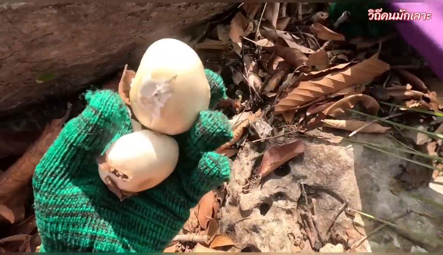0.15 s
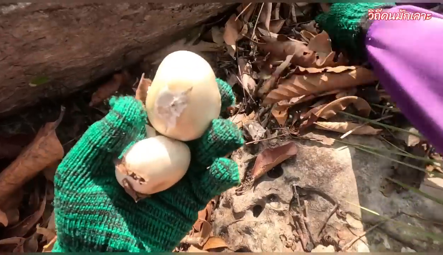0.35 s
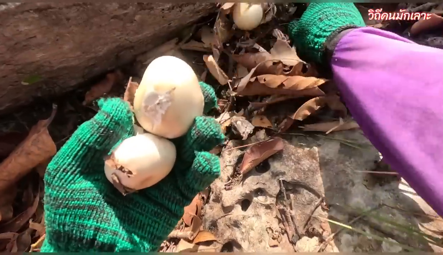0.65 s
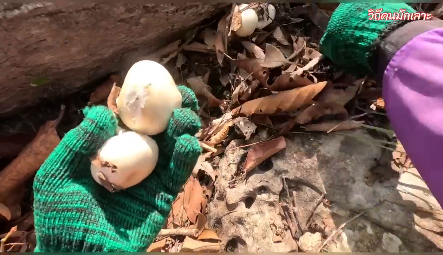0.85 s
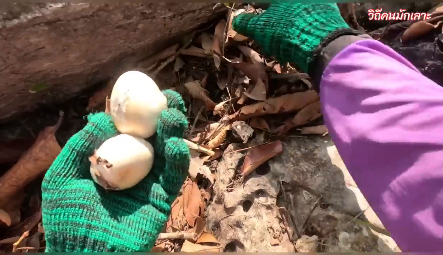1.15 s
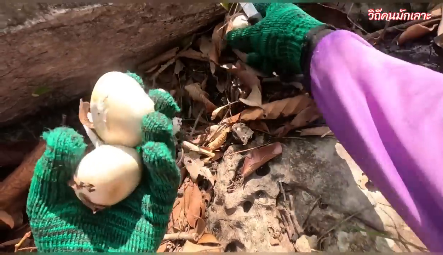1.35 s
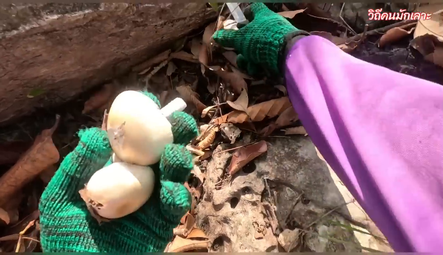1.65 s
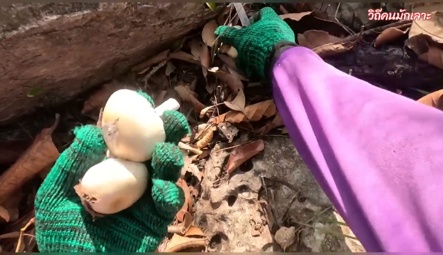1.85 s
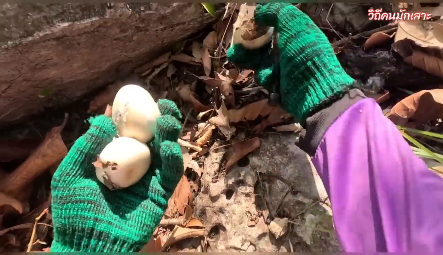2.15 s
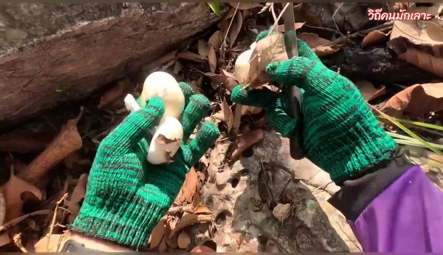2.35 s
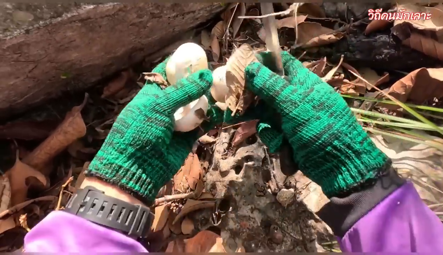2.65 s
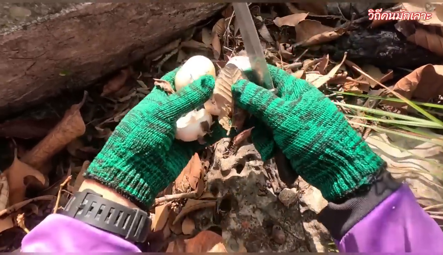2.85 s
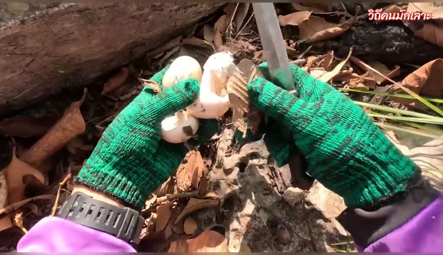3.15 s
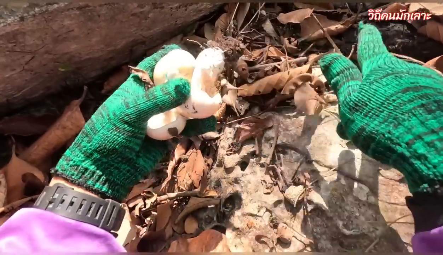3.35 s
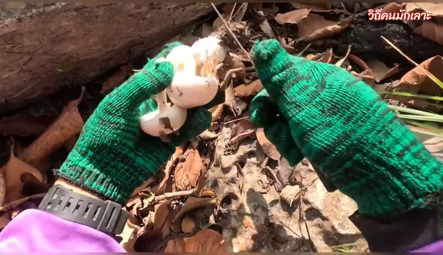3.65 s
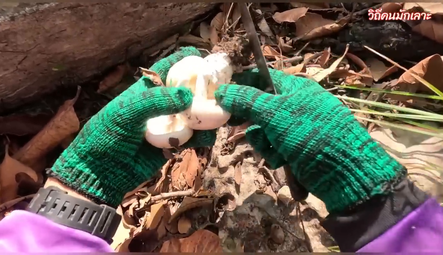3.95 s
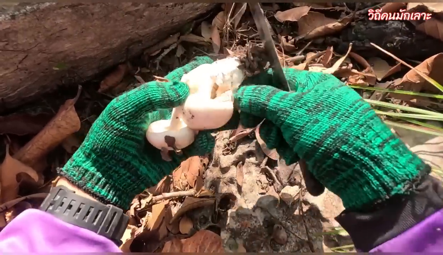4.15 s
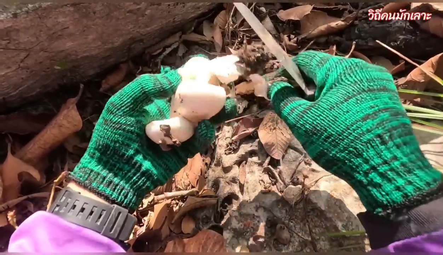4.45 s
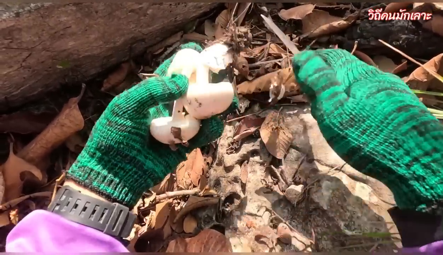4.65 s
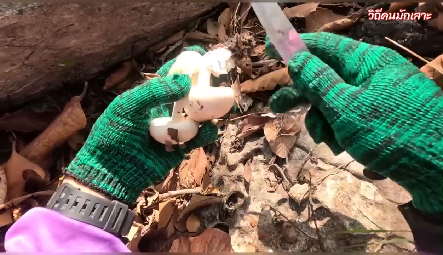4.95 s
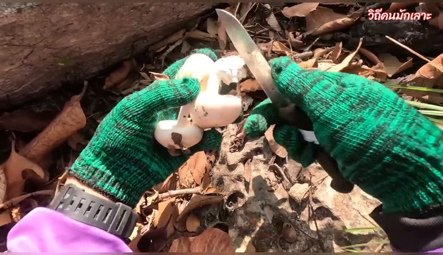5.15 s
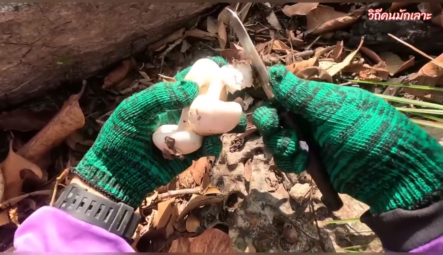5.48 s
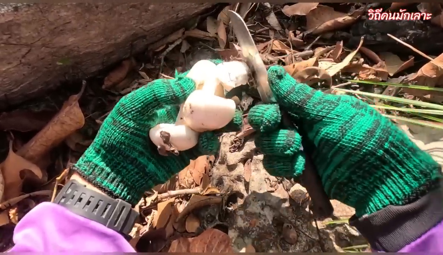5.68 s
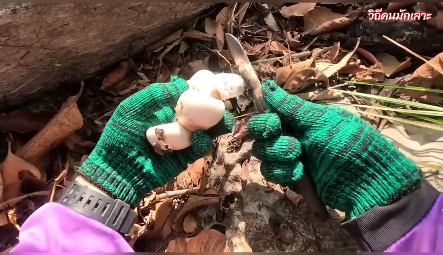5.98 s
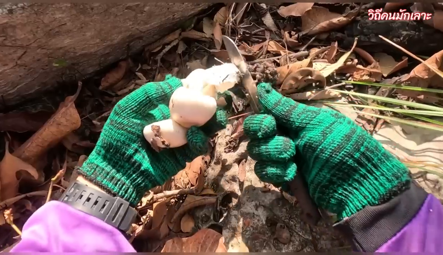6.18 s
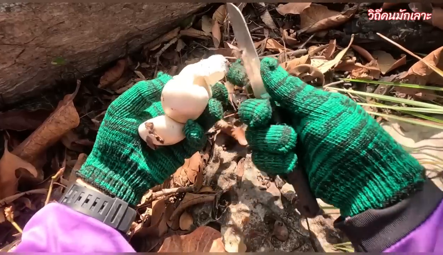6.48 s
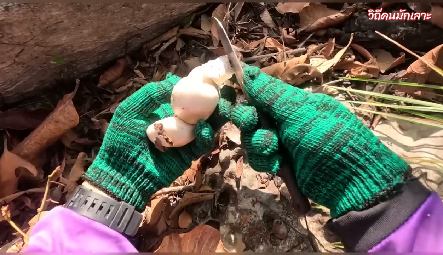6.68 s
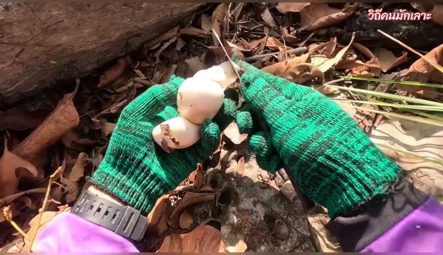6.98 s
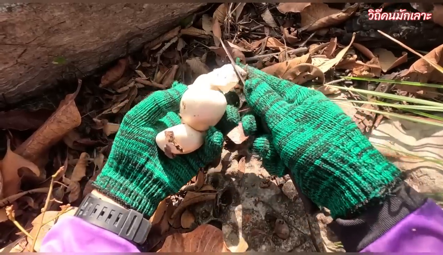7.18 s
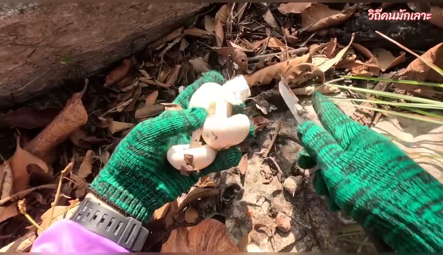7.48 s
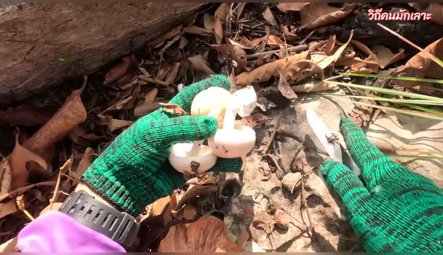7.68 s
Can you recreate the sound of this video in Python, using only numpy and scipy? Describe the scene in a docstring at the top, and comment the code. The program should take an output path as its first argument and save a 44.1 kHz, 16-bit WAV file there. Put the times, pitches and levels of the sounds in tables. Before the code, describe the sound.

From 0 to about 0.9 seconds, gloved hands rake dry leaves close to the microphone, slightly right of centre: dense bright rustle, brittle crackles and sharp snaps. From 1.1 to 2.1 seconds the stirring continues in softer, hissier strokes with scattered cracks, then falls away with a few light ticks and a soft knock near 2.3. A near-quiet gap follows, with faint outdoor hush and thin wavering insect tones. At 3.1 to 4.3 seconds small peeling crackles gather, strongest around 3.8, ending in a dull low tap. Sparse tiny clicks and scrapes follow, including a cluster near 4.8 and a tick with a knock at 5.5. A crisp snap at 6.5 and another at 7.0 stand out among delicate trimming crackles. Slight rustling closes the scene, now narrow and central.

```python
"""Gloved hands rake dry leaves on a forest floor, then peel and trim mushrooms close to the microphone.
Leaves rustle as many tiny clicks that ring short bursts of noise, mixed with friction hiss.
Single leaves and crusts snap as bursts of clicks with ringing tones; soft knocks are short low tones.
Far insects sing as thin wavering tones over a hush of filtered noise.
The sound starts wide and narrows to the centre."""
import sys
import numpy as np
from scipy import signal
from scipy.fft import rfft, irfft, next_fast_len
from scipy.io import wavfile
from scipy.ndimage import uniform_filter1d

SR = 44100
rng = np.random.default_rng(int(sys.argv[2]) if len(sys.argv) > 2 else 0)


def unload_wav(signal):
    """Save mono or channel-first audio to the path in sys.argv[1] as 16-bit WAV at rate SR, clipped to [-1, 1]."""
    wavfile.write(
        sys.argv[1],
        SR,
        np.round(np.clip(np.atleast_2d(signal).T, -1, 1) * 32767).astype(np.int16),
    )


N = 344862  # length [samples]

# Colour of the leaf litter, for rustle and snaps: (frequency [Hz], relative level [dB per Hz])
LEAF_COLOUR = [(59, -36), (110, -14), (185, -8), (471, -16), (750, -18.5), (980, -14.5), (1230, -16),
               (1390, -14.5), (2080, -13.5), (2320, -11), (3860, -0.5), (4380, -5), (7450, 1.5),
               (10200, -26.5), (11900, -20), (16000, -50)]


def gain_of(db):
    """Turns decibels into a factor that multiplies the sound."""
    return 10 ** (np.asarray(db) / 20)


def evened(x):
    """Scales x to an average (RMS) strength of 1."""
    return x / np.sqrt(np.mean(x ** 2) + 1e-20)


def curve(rows):
    """Draws straight lines between rows of (time [s], values...), giving one curve per value column."""
    s, *columns = np.transpose(list(rows))
    t = np.arange(N) / SR
    return [np.interp(t, s, column) for column in columns]


def coloured(x, points):
    """Makes some pitches of x stronger than others, following points of (frequency [Hz], level [dB])."""
    length = x.shape[-1]
    size = next_fast_len(length)
    hz, db = np.transpose(points)
    pitches_hz = np.fft.rfftfreq(size, 1 / SR)
    # The 1 added keeps the logarithm safe at 0 Hz.
    gain = gain_of(np.interp(np.log(pitches_hz + 1), np.log(hz + 1), db))
    return irfft(rfft(x, size) * gain, size)[..., :length]


def band(x, lo_hz, hi_hz):
    """Keeps the pitches between two limits and weakens the rest."""
    return signal.sosfilt(signal.butter(3, [lo_hz, hi_hz], "bandpass", fs=SR, output="sos"), x)


def below(x, hz):
    """Keeps the pitches below a limit, without delaying them."""
    return signal.sosfiltfilt(signal.butter(3, hz, fs=SR, output="sos"), x)


def top(x):
    """Keeps the pitches above 10.4 kHz, without delaying them."""
    return signal.sosfiltfilt(signal.butter(4, 10400, "highpass", fs=SR, output="sos"), x)


def crackle(shape, per_s, spread_db):
    """Scatters clicks of random sign; a few are much larger than the rest."""
    size = gain_of(spread_db * np.minimum(rng.exponential(1, shape), 4))
    clicks_here = rng.random(shape) < per_s / SR
    return size * rng.standard_normal(shape) * clicks_here


def rustle():
    """Crackles swell in clumps; each rings a leaf for a moment, and friction adds a smooth hiss."""
    # Friction hiss against the crackle, and how far clumps swell: (time [s], hiss [dB], fitfulness [dB])
    texture = [(0, 3.5, 1.75), (1.0, 20.5, 1.9), (1.4, 14, 1.4), (2.1, -3, 1.5), (2.4, 8, 3.5), (4.8, 0, 2),
               (7.2, -4, 1), (7.45, 8, 1.3), (7.82, 5.5, -0.2)]
    # Low end, full only while digging: (time [s], level [dB])
    body = [(0, -1), (.85, -1), (1.1, -7), (2.0, -6), (2.4, -14), (7.82, -16)]
    # Lift of the band above 10.4 kHz before the crisp part is evened: (time [s], relative level [dB])
    top_lift = [(0, -3.5), (2.0, 0.5), (2.6, 8), (3.6, 8), (4.5, 2.5), (5.5, 5), (7.0, 3.5), (7.82, 5.5)]

    crisp_gain, dull_gain = effort()
    hiss_db, fitful_db = curve(texture)
    low_gain = gain_of(curve(body)[0])
    top_gain = gain_of(curve(top_lift)[0])
    clumps = evened(uniform_filter1d(uniform_filter1d(rng.standard_normal(N), 500), 300))

    t = np.arange(500) / SR
    grains = np.zeros((2, N))  # row 0 is the centre, row 1 the side
    for hz in np.geomspace(400, 6000, num=10):  # from large, dull leaves to small, bright ones
        dying_noise = rng.standard_normal(len(t)) * gain_of(-60 * t / 0.019)
        ring = band(dying_noise, hz, 3 * hz)
        clicks = crackle((2, N), 150, spread_db=4.5)
        grains += signal.oaconvolve(clicks, ring[None])[:, :N]

    hiss_gain = gain_of(hiss_db)
    mixed = evened(grains) + hiss_gain * rng.standard_normal((2, N))
    steady = mixed / np.sqrt(1 + hiss_gain ** 2)  # more hiss does not make it louder
    leaves = coloured(gain_of(fitful_db * clumps) * steady, LEAF_COLOUR)

    low, dull = below(leaves, 1050), below(leaves, 2500)
    crisp = evened(leaves - dull + (top_gain - 1) * top(leaves))
    return crisp_gain * crisp + dull_gain / np.std(dull) * (dull - low + low_gain * low)


def effort():
    """Gives crisp and dull rustle gains: strokes rise, hold and die away over the stirring."""
    # Hands and sleeves stir faintly all along: (time [s], level [dB], dull part against it [dB])
    stir = [(0, -39, -3.5), (.9, -36, -4.5), (1.2, -52.5, -5), (1.4, -51, 3.5), (2.0, -44.5, -3.5),
            (2.25, -58, -2), (2.8, -70, -7), (3.05, -71.5, 5.5), (3.3, -64.5, -10), (3.5, -65.5, 5),
            (3.7, -62, 3), (3.95, -61.5, 2), (4.35, -65.5, -4.5), (4.7, -56.5, -10.5), (5.0, -64.5, -20),
            (5.2, -64, -5), (5.45, -71, -7), (5.7, -67, -4), (6.0, -76, -11), (6.22, -94, -15),
            (6.4, -76, 1), (6.9, -70, -3), (7.19, -73, -8), (7.3, -85, 7), (7.82, -54.5, -7)]
    # Strokes through leaves and over caps: (start [s], hold [s], effort [dB], dull part against it [dB])
    strokes = [(0.026, 0.0097, -32, -5), (0.244, 0.18, -33.5, -9), (0.517, 0.087, -33.5, -5),
               (0.554, 0.1, -26.5, -4.5), (0.679, 0.04, -35, 1), (0.725, 0.026, -30, -7.5),
               (0.789, 0.046, -35, -6), (0.959, 0.11, -39, -5.5), (1.131, 0.0074, -38, -4.5),
               (1.25, 0.046, -42, 0.5), (1.32, 0.13, -37, -3), (1.509, 0.011, -40, -0.5),
               (1.606, 0.11, -40, -1), (1.746, 0.047, -37, -2.5), (1.92, 0.2, -48.5, -6),
               (2.319, 0.14, -58.5, 2), (2.546, 0.17, -60, -1.5), (2.765, 0.13, -61, 1.5),
               (3.103, 0.012, -53.5, -6), (3.3, 0.15, -56.5, -5.5), (4.067, 0.027, -53.5, -7),
               (4.102, 0.014, -53.5, 1.5), (4.12, 0.14, -52, -7.5), (4.386, 0.022, -69.5, 9.5),
               (4.65, 0.017, -56.5, -23), (4.751, .01, -63, 0), (4.766, 0.013, -48.5, -8),
               (5.148, 0.04, -58.5, -14), (5.337, 0.016, -61, -7), (5.819, 0.03, -62, -3),
               (5.96, 0.012, -58.5, -5), (6.039, 0.0054, -63, -3), (6.088, 0.0076, -54, -2.5),
               (6.117, 0.005, -58, -19), (6.242, 0.31, -63, -13), (6.32, .02, -76, -20),
               (6.496, 0.021, -39, -8), (6.592, 0.041, -50.5, -3), (6.665, 0.1, -55, -1),
               (6.804, 0.034, -57.5, -6.5), (7.1, 0.0044, -54.5, -1.5), (7.232, 0.0082, -66, 5.5),
               (7.348, 0.13, -61.5, 0.5), (7.408, 0.32, -56, -3.5), (7.502, 0.18, -59, 2)]
    rise_s, fall_db_per_s = 0.004, 264

    t = np.arange(N) / SR
    stir_db, stir_dull_db = curve(stir)
    crisp_power = gain_of(stir_db) ** 2
    dull_power = gain_of(stir_db + stir_dull_db) ** 2
    for s, hold_s, db, dull_db in strokes:
        rise = np.clip((t - s) / rise_s, 0, 1)
        falling_s = np.maximum(t - s - rise_s - hold_s, 0)
        power = (rise * gain_of(db - fall_db_per_s * falling_s)) ** 2
        crisp_power = crisp_power + power
        dull_power = dull_power + power * gain_of(dull_db) ** 2
    return np.sqrt(crisp_power), np.sqrt(dull_power)


def snaps():
    """A crack runs through dry matter as a burst of clicks and rings the piece; lower parts last longer."""
    # Snaps: (time [s], middle part's peak [dB], bright part against it [dB], dull part against it [dB],
    # low tone [Hz], high tone [Hz], time for the middle part's clicks to fall 60 dB [s])
    snap_rows = [(0.0353, -10.5, -1.5, -15, 1400, 7400, 0.035), (0.1176, -20, -2, -27, 2300, 7140, 0.041),
                 (0.2035, -26, -17, -9.5, 1000, 5430, 0.036), (0.216, -20.5, -1.5, -22, 2700, 5300, 0.068),
                 (0.2562, -13.5, -24, -25, 2220, 5100, 0.024), (0.2953, -14, -4, -26, 2670, 3820, 0.028),
                 (0.3125, -14, -1.5, -10.5, 1010, 7760, 0.084), (0.347, -19, 0, -16, 2470, 3900, 0.024),
                 (0.3728, -19, -11, -9, 2430, 4060, 0.022), (0.385, -14, -11, -11, 1630, 4000, 0.011),
                 (0.421, -23.5, -17, -0.5, 2800, 3500, 0.032), (0.4712, -15.5, -2.5, -5, 1960, 7450, 0.013),
                 (0.5232, -25, 2, -8, 1700, 7660, 0.019), (0.6164, -22, 11, -15, 2730, 7200, 0.019),
                 (0.6372, -14.5, 0.5, -14, 1330, 7500, 0.073), (0.7296, -15, -5, -30, 2690, 3290, 0.033),
                 (0.8137, -13, -8, -23, 1730, 7350, 0.014), (1.144, -29, -12, 1.5, 1400, 5100, 0.024),
                 (1.232, -26, -6, -7, 1760, 5600, 0.026), (1.2397, -15, -3.5, 0.5, 2560, 2800, 0.014),
                 (1.2553, -20, 0, -17, 2940, 7240, 0.034), (1.2597, -16, -4, -12, 2470, 3700, 0.031),
                 (1.3365, -24, 7.5, -25, 2440, 7750, 0.011), (1.3633, -28, -10, -24, 2660, 4970, 0.022),
                 (1.3929, -17.5, -7.5, -5.5, 930, 3260, 0.069), (1.488, -26.5, -4, -22, 2420, 7000, 0.034),
                 (1.5247, -23.5, -6, -24, 2530, 3940, 0.038), (1.6045, -22.5, -9, -27, 2740, 3080, 0.016),
                 (1.6694, -23.5, -1, -22, 1500, 3200, 0.017), (1.7125, -39, -1, -13, 2710, 6440, 0.018),
                 (1.7587, -27.5, 8, -7, 2030, 7400, 0.0069), (1.8891, -40, -9, -18, 2780, 7360, 0.022),
                 (1.9, -31, -17, -15, 1610, 3220, 0.026), (1.9663, -21, -3, -9.5, 2360, 7000, 0.031),
                 (1.992, -37, -9, -5, 1340, 7050, 0.022), (2.093, -28.5, -17, -15, 2020, 3110, 0.027),
                 (2.223, -25.5, -14, -29, 2300, 4200, 0.012), (2.2653, -41, 2, 0.5, 1200, 7040, 0.017),
                 (2.279, -26.5, -1.5, -31, 3070, 7550, 0.012), (2.337, -39.5, -8, -1, 1910, 3870, 0.015),
                 (2.357, -42, -13, 6.5, 1330, 3570, 0.016), (2.381, -43, -9, -14, 2040, 3660, 0.017),
                 (2.394, -32.5, -6, -1, 1270, 3750, 0.031), (2.4577, -33.5, -7, -20, 1030, 4040, 0.03),
                 (2.5483, -34.5, 2, -32, 2530, 7600, 0.14), (3.133, -35.5, -12, -9, 1970, 5500, 0.052),
                 (3.316, -37, -3, -27, 2320, 6830, 0.02), (3.3345, -30, -1, -20, 1990, 5270, 0.013),
                 (3.351, -28.5, 0, -30, 2400, 4800, 0.044), (3.3837, -22.5, 2, -13, 1970, 4340, 0.023),
                 (3.3994, -40, -12, -16, 2800, 3620, 0.017), (3.4267, -25.5, -7, -26, 1980, 3730, 0.023),
                 (3.431, -39.5, 11, -1, 1300, 7100, 0.019), (3.461, -25, -28, -1, 1870, 3220, 0.015),
                 (3.4844, -45, -10, -16, 2800, 4640, 0.02), (3.496, -29, -9, -9, 1270, 3350, 0.015),
                 (3.5245, -35, -2, -7, 2440, 4650, 0.022), (3.573, -42, -8, -17, 2200, 3600, 0.01),
                 (3.5876, -30.5, -7.5, -8.5, 1900, 4550, 0.035), (3.611, -43, -6, -9, 2300, 4600, 0.011),
                 (3.6272, -34, -9, -14, 1840, 4530, 0.053), (3.661, -41, -2, -20, 2500, 4630, .025),
                 (3.688, -38, -3, -19, 2600, 4740, 0.038), (3.746, -46, -10, -4, 2300, 3000, .01),
                 (3.7604, -45, -12, -19, 2700, 5600, 0.014), (3.777, -18, -3.5, -7, 2980, 4080, 0.024),
                 (3.8009, -14, -10, -5, 1080, 4030, 0.032), (3.8464, -18.5, -13, -1, 2340, 4270, 0.024),
                 (3.873, -43, -8, 6, 1980, 5680, 0.015), (3.9026, -31.5, -22, 1.5, 1360, 3140, 0.039),
                 (3.92, -38, -13, 0, 2070, 2840, 0.022), (3.9439, -51, -9, 6, 2390, 3920, 0.01),
                 (3.9759, -26, -12, 2, 2100, 5050, 0.021), (4.0067, -33, -19, -12, 2040, 4200, 0.012),
                 (4.073, -46, 1, -4, 2340, 7600, 0.03), (4.091, -41, -2, 8.5, 1970, 5650, 0.028),
                 (4.118, -37, 5, -16, 2690, 6750, 0.015), (4.1592, -30, 1.5, -7.5, 2030, 7600, 0.035),
                 (4.1956, -27, -4, -2.5, 2190, 3310, 0.0052), (4.2133, -30.5, -5, -24, 2690, 6440, 0.0081),
                 (4.2444, -27, -3, -26, 2820, 7250, 0.0083), (4.253, -37, 0, -10, 2300, 7400, 0.011),
                 (4.2624, -40, -5, -11, 2740, 7290, 0.019), (4.3081, -34, -6, 0, 1390, 3000, 0.014),
                 (4.3066, -29.5, -9, 1, 2150, 3340, 0.011), (4.526, -46, -1, -8, 2300, 3800, .015),
                 (4.6657, -41, 6, -23, 2500, 4000, 0.017), (4.7145, -48, 5, -18, 2800, 5800, .012),
                 (4.7487, -54, -9, 0, 1920, 5760, 0.022), (4.769, -27, -17, -13.5, 2190, 3550, 0.031),
                 (4.7835, -35.5, -9, -22, 2370, 5300, 0.02), (4.788, -34, -4, -15, 2380, 5630, 0.011),
                 (4.795, -40, 5, -15, 2500, 7370, 0.02), (4.824, -44, 1, -15, 2800, 6500, .012),
                 (4.8352, -43, 2, -17, 2500, 7800, .015), (4.8747, -31, -11, -14, 2130, 4430, 0.052),
                 (4.9204, -42.5, -4, -14, 2820, 4000, 0.018), (5.022, -46, -3, -25, 2750, 5770, 0.018),
                 (5.1835, -40, -8, -9, 2500, 3300, 0.013), (5.212, -49, -10, -7, 2100, 3260, .015),
                 (5.4996, -27.5, -4, -12.5, 2810, 4400, 0.005),
                 (5.853, -38.5, -12, -16, 2900, 3600, 0.0062), (5.9704, -38, -13, -20, 2870, 5780, 0.031),
                 (6.043, -45, -16, -2.5, 1200, 5640, 0.025), (6.098, -33, -8, -11, 2300, 5110, 0.028),
                 (6.128, -40.5, 6, -13, 2350, 5660, 0.028), (6.4648, -42, -7, -19, 2600, 4440, 0.011),
                 (6.5073, -17, -7, -38, 2240, 3760, 0.018), (6.5889, -42, 2, -16, 2480, 5660, 0.022),
                 (6.6112, -31, -8, -24, 2690, 3940, 0.013), (6.6444, -33, -12, -7, 1830, 6470, 0.024),
                 (6.711, -34.5, -2, -8, 2800, 3650, 0.022), (6.7487, -35, -21, -21, 2500, 3700, 0.022),
                 (6.7894, -55, -8, -16, 2700, 5800, 0.022), (6.817, -44, -10, -19, 2760, 3120, 0.024),
                 (6.8478, -39, -12, -23, 2450, 5820, 0.036), (6.996, -21.5, -9, -12.5, 2300, 3980, 0.011),
                 (7.0232, -31, -6, -16, 2720, 4140, 0.016), (7.0313, -41, 0, -15, 2600, 4600, 0.019),
                 (7.073, -44, -7, -16, 2590, 5800, 0.019), (7.1088, -27.5, -4, -19, 2820, 4300, 0.056),
                 (7.132, -38, -15, -16, 1420, 5780, 0.024), (7.243, -39, -14, -12, 1510, 5700, 0.041),
                 (7.6231, -36, -5, -25, 2190, 4800, 0.036)]

    t = np.arange(3072) / SR
    out = np.zeros((2, N + len(t)))
    for s, db, bright_db, dull_db, low_hz, high_hz, decay_s in snap_rows:
        burst = crackle((2, len(t)), 14000, spread_db=4.5)
        burst[:, 8] += 8.0  # the first break
        tones_hz = [low_hz, high_hz, rng.uniform(5130, 10500)]
        width_hz = 6 / decay_s  # a short snap rings less purely
        # Each part: (level against the middle [dB], lowest [Hz], highest [Hz], times the decay)
        parts = [(bright_db, 5500, 16000, 0.8), (0, 2500, 5500, 1), (dull_db, 1050, 2500, 1.5)]
        at = round(s * SR)
        for part_db, lo_hz, hi_hz, longer in parts:
            crack = burst * gain_of(-60 * t / (decay_s * longer))
            part = band(coloured(ringing(crack, tones_hz, width_hz), LEAF_COLOUR), lo_hz, hi_hz)
            centre_peak = abs(signal.hilbert(part[0])).max()
            out[:, at:at + len(t)] += gain_of(db + part_db) * part / centre_peak
    return out[:, :N]


def ringing(x, tones_hz, width_hz):
    """Lifts the piece's own tones out of x with narrow resonances."""
    ring_db = 11  # level of the added tones
    tones = sum(signal.lfilter(*signal.iirpeak(hz, hz / width_hz, SR), x) for hz in tones_hz)
    return x + gain_of(ring_db) * tones


def knocks():
    """A dull blow sounds as a quickly dying low tone together with a wide thud."""
    # Soft knocks of knuckle or knife handle: (time [s], peak [dB], pitch [Hz])
    knock_rows = [(2.263, -49, 197), (3.131, -41.5, 189), (4.303, -47, 330), (5.5, -47.5, 203),
                  (6.507, -44, 131), (7.106, -47.5, 138)]
    ring_s, thud_share = 0.035, 0.9  # time to fall 60 dB; strength of the thud against the tone

    t = np.arange(4000) / SR
    out = np.zeros(N + len(t))
    for s, db, hz in knock_rows:
        thud = evened(band(rng.standard_normal(len(t)), 120, 900))
        tone = np.sin(2 * np.pi * hz * t)
        blow = (tone + thud_share * thud) * gain_of(-60 * t / ring_s)
        at = round(s * SR)
        out[at:at + len(t)] += gain_of(db) * blow / abs(blow).max()
    return out[:N]


def insects():
    """Each singer is a slightly fuzzy tone that drifts evenly and wavers in pitch; some throb."""
    # Singers: (start [s], end [s], start pitch [Hz], end pitch [Hz], width [Hz], throb depth [0-1])
    singers = [(2.7, 7.45, 5690, 5822, 20, .8), (2.7, 7.9, 6340, 6470, 15, 1),
               (4.85, 6.55, 5697, 5695, 5, 0), (4.2, 7.9, 5900, 5955, 12, .4),
               (4.25, 5.6, 6014, 6013, 6, 0), (5.0, 6.5, 6090, 6112, 8, 0), (5.55, 6.55, 6325, 6325, 8, 0),
               (6.7, 7.5, 6205, 6200, 8, 0), (5.1, 6.4, 5140, 5134, 10, 0), (4.4, 5.5, 5385, 5382, 10, 0)]
    # One row for each singer: levels at even steps from its start to its end [dB]
    singer_levels = [(-84, -66, -67.5, -70, -65, -62.5, -64.5), (-86, -72, -88, -71, -65, -73, -65),
                     (-68, -64.5, -65), (-82, -73, -87), (-70, -65, -71), (-80, -77, -80), (-66, -74, -78),
                     (-81, -65.5, -70), (-86, -74, -82), (-82, -88, -87)]
    fade_s, throb_per_s = 0.15, 26
    fuzz_per_hz = 0.012  # wider voices waver more [radians per Hz of width]

    t = np.arange(N) / SR
    out = np.zeros(N)
    for (start, end, start_hz, end_hz, width_hz, depth), levels_db in zip(singers, singer_levels):
        steps = len(levels_db)
        times = np.linspace(start, end, steps)
        hz, db = curve(zip(times, np.linspace(start_hz, end_hz, steps), levels_db))

        memory = np.exp(-np.pi * width_hz / SR)  # smooths noise into a slow wander
        wander = signal.lfilter([1], [1, -memory], rng.standard_normal(N))
        fuzz = evened(signal.lfilter([1], [1, -memory], wander))
        tone = np.cos(2 * np.pi * np.cumsum(hz) / SR + fuzz_per_hz * width_hz * fuzz)

        unsteady = evened(uniform_filter1d(rng.standard_normal(N), 9000))
        beats = throb_per_s * t + rng.random() + 0.037 * unsteady
        throb = 1 + depth * np.cos(2 * np.pi * beats)
        fade = np.clip(np.minimum(t - start, end - t) / fade_s, 0, 1)
        out += gain_of(db) * fade * evened(tone * throb)
    return out


def air():
    """The forest's steady hush is random noise, coloured so that the lowest pitches are strongest."""
    # Colour of the hush: (frequency [Hz], relative level [dB per Hz])
    air_colour = [(12, -25), (22, 7), (50, 2), (85, -10), (280, -17), (698, -36), (1000, -37), (1290, -31),
                  (3250, -26), (4540, -29), (5300, -20), (6180, -15), (7200, -22), (10200, -48),
                  (12800, -47), (16000, -70)]
    return gain_of(-59.5) * evened(coloured(rng.standard_normal((2, N)), air_colour))


def scene():
    """Mixes all sources; the side signal is what makes left and right differ."""
    # Width of the sound: (time [s], factor on the side signal [dB])
    width = [(0, -12), (1.5, -11), (2.2, -15.5), (2.9, -37.5), (7.82, -51)]
    # The digging hand is right of centre: (time [s], share of the centre moved left [negative: right])
    lean = [(0, -0.13), (1.2, -0.13), (2.6, -0.0068), (2.9, -0.0049), (7.82, .001)]
    top_side_db = -5.5  # an extra share keeps the pitches above 10.4 kHz wide

    centre, side = rustle() + snaps() + air()
    narrowed = side * gain_of(curve(width)[0])
    side = narrowed + gain_of(top_side_db) * top(side) + curve(lean)[0] * centre
    centre = centre + insects() + knocks()
    return np.array([centre + side, centre - side])


def record(dry):
    """Adds a faint high hiss of its own to each channel, then removes pitches above the band limit."""
    hiss_db, edge_hz = -92, 15900
    hiss = gain_of(hiss_db) * evened(band(rng.standard_normal(dry.shape), 10500, 18000))
    limit = signal.firwin(511, edge_hz, window=("kaiser", 9), fs=SR)
    return signal.oaconvolve(dry + hiss, limit[None], "same")


dry = scene()
out = record(dry)
unload_wav(out)
```